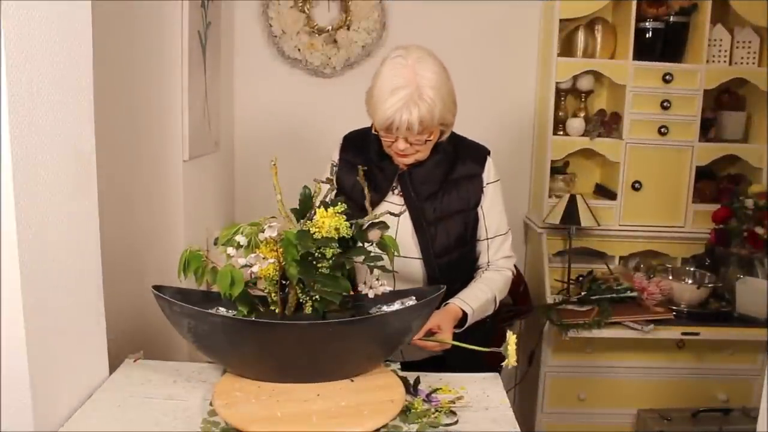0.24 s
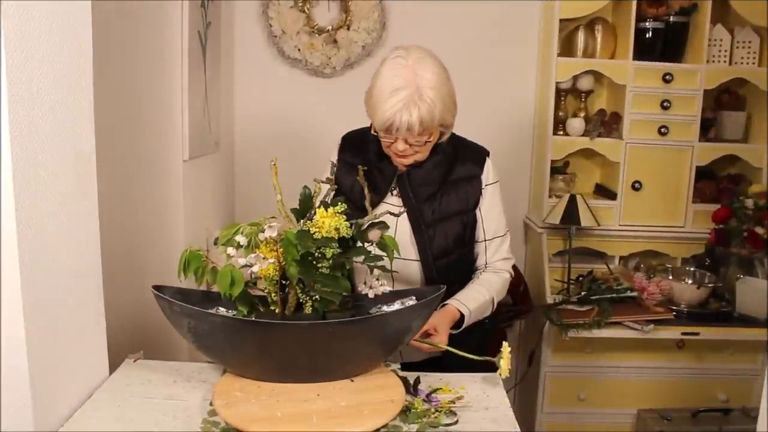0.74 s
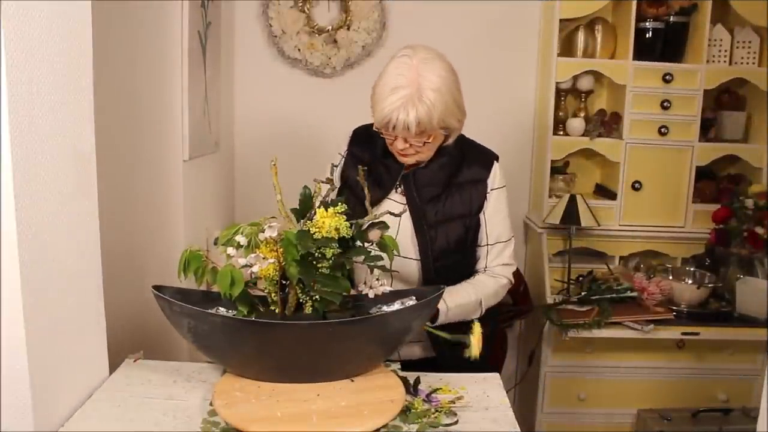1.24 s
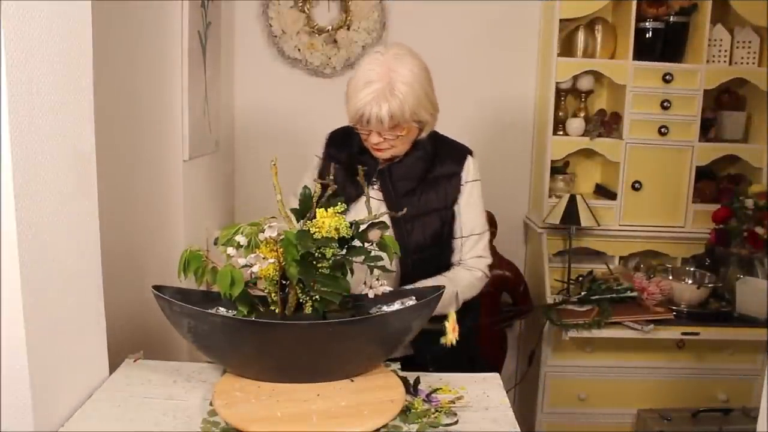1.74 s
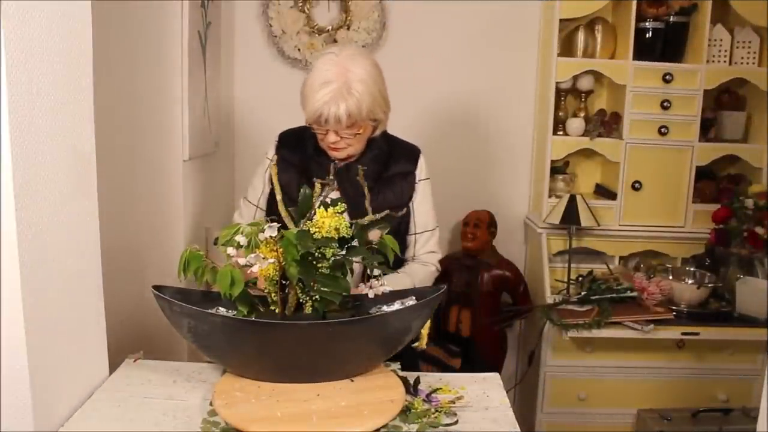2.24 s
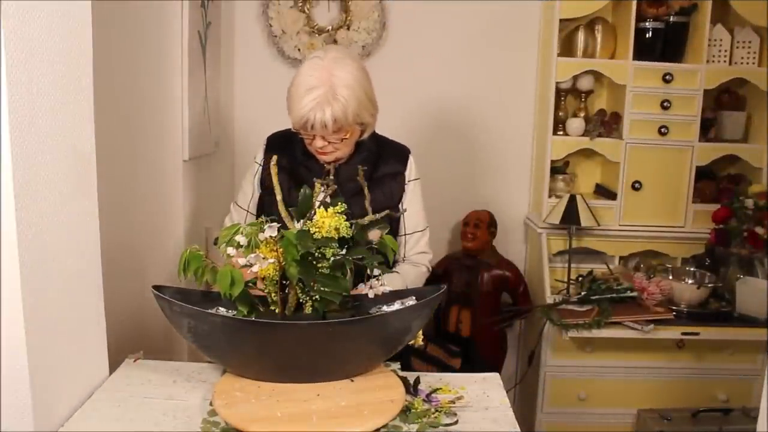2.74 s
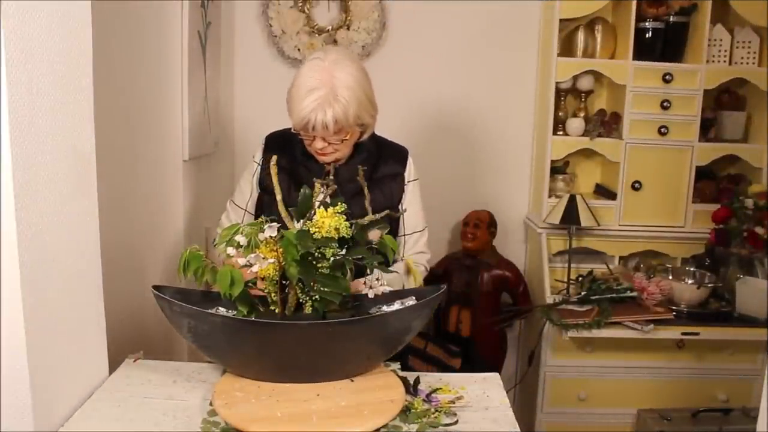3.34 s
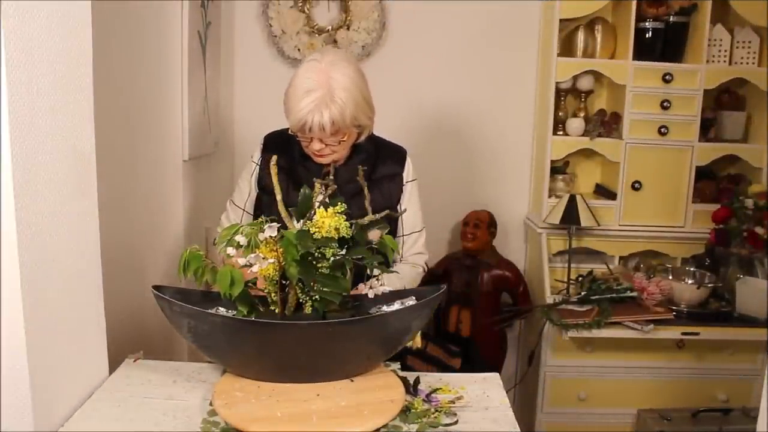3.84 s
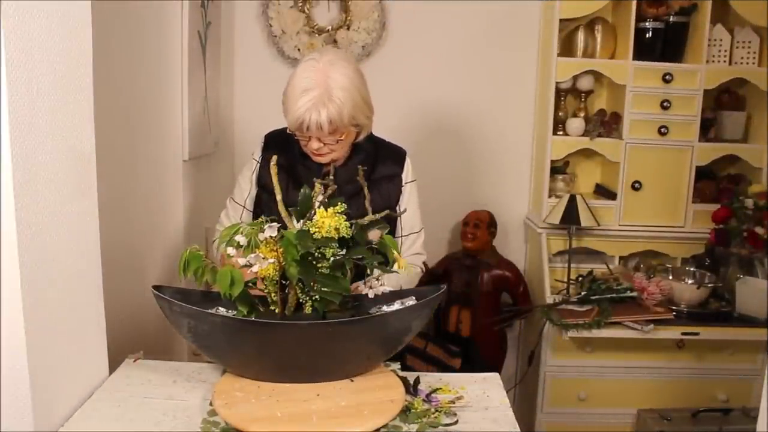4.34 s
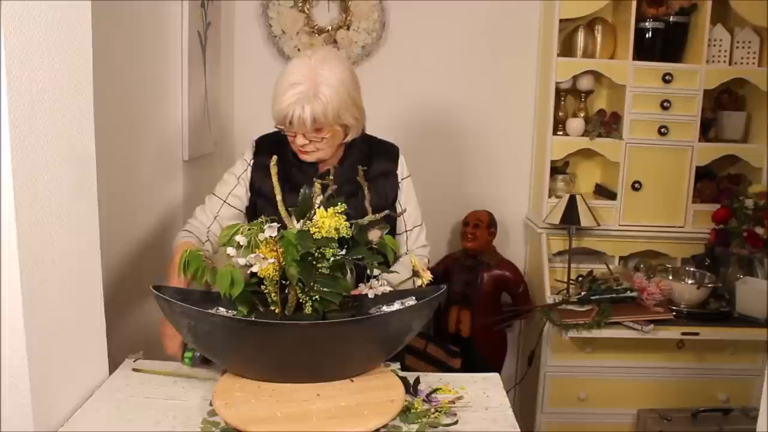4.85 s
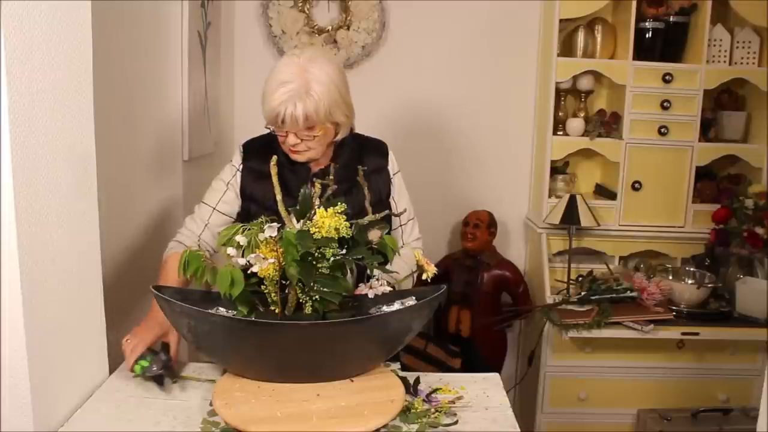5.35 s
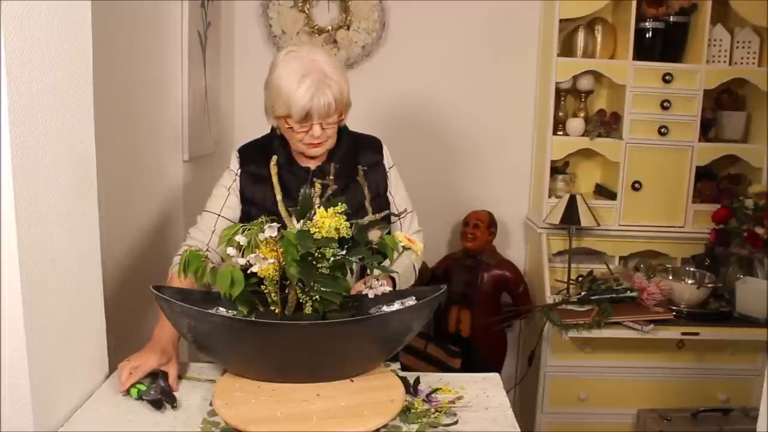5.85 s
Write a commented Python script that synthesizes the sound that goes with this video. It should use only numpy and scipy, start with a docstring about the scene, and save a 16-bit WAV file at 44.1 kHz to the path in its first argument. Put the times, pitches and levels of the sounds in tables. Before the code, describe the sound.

Quiet flower arranging indoors: leafy crackles, sleeve brushes, soft bowl bumps, two crisp snips, and a tool clattering onto a ringing tabletop.

```python
"""Flower arranging at a table

Flowers are arranged in a small, lively room: leaves tick and rustle, secateurs snip two stems (noisy
cracks and ringing steel), and stems bump a bowl. Then the secateurs clatter on the table top, whose
modes ring, slide across it in uneven slips and are set down with a loud knock. Sleeves brush as the
arms move; room reflections surround it all over steady room tone and microphone hiss."""
import sys
import numpy as np
from scipy import signal
from scipy.fft import rfft, irfft
from scipy.io import wavfile

SR = 44100
rng = np.random.default_rng(int(sys.argv[2]) if len(sys.argv) > 2 else 0)


def transcribe(signal):
    """Save signal, clipped to [-1, 1], as a 16-bit WAV file at the path in sys.argv[1]."""
    frames = np.atleast_2d(signal).T
    limited = np.clip(frames, -1, 1)
    pcm = np.round(limited * 32767).astype(np.int16)
    wavfile.write(sys.argv[1], SR, pcm)


N = 268128
TIME = np.arange(N) / SR
CUTOFF_HZ = 16050  # top of the audible band here


def from_db(db):
    """Decibels to gain."""
    return 10 ** (np.asarray(db) / 20)


def unit_energy(x):
    """Scale so that the squares sum to one."""
    return x / np.sqrt(np.sum(x ** 2) + 1e-20)


def at_hz(points, hz):
    """Read a table on a log-frequency axis."""
    known_hz, values = np.transpose(points)
    return np.interp(np.log(hz + 1), np.log(known_hz), values)


def add(track, start_s, sound):
    """Mix a sound into the track at start_s."""
    start = round(start_s * SR)
    track[start:start + len(sound)] += sound[:N - start]


def bins(size=4096):
    """Frequencies (Hz) on which short sounds are coloured."""
    return np.arange(size // 2 + 1) * SR / size


def pulse(colour_db):
    """The most compact causal pulse with this spectrum (minimum phase), at unit energy."""
    cepstrum = irfft(np.log(from_db(colour_db)))
    half = len(cepstrum) // 2
    # fold the cepstrum on to positive time, which makes the pulse causal
    cepstrum[1:half] *= 2
    cepstrum[half + 1:] = 0
    return unit_energy(irfft(np.exp(rfft(cepstrum))))


def coloured(x, spectrum):
    """Give a long signal a spectrum, at rms 1."""
    shaped = signal.fftconvolve(x, pulse(at_hz(spectrum, bins())))[:N]
    return unit_energy(shaped) * np.sqrt(N)


def ring(x, pitch_hz, t60_s):
    """One decaying mode: a unit click sets a wave of height 1 ringing."""
    radius = from_db(-60 / (t60_s * SR))
    angle = 2 * np.pi * pitch_hz / SR
    return signal.lfilter([.5, 0, -.5], [1, -2 * radius * np.cos(angle), radius * radius], x + 1e-18)


def grains(per_s, spread_db):
    """Random tiny slips of uneven size and either sign."""
    slips = rng.random(N) < per_s / SR
    signs = rng.choice([-1, 1], N)
    sizes = from_db(spread_db * np.clip(rng.standard_normal(N), -2, 2))
    return slips * signs * sizes


def swells(moves, shape):
    """Gain of friction: each move's speed is a half sine, and loudness is a power of the speed."""
    gain = np.zeros(N)
    for middle_s, length_s, level_db in moves:
        speed = np.cos(np.pi * np.clip((TIME - middle_s) / length_s, -.5, .5))
        gain += from_db(level_db) * np.abs(speed) ** shape
    return gain


def crack(colour_db, length_s, grit, size=2048, count=3):
    """A sharp contact with a short burst of breaking or rubbing fibres; grit sets the burst's share."""
    fade = np.exp(-np.arange(size) / SR / length_s)
    burst = grit * unit_energy(rng.standard_normal(size) * fade)
    burst[0] += 1
    # the burst has no pitch of its own: even out its spectrum and keep it short
    for _ in range(count):
        flat = irfft(np.exp(1j * np.angle(rfft(burst))))
        burst = flat * fade ** (1 / count)
    return unit_energy(signal.fftconvolve(burst, pulse(colour_db)))


def snips(grit):
    """Each snip is a few quick noisy cracks, mixing splitting stem and steel contact, with a ring of the blades."""
    # each cut is a few cracks in quick succession:
    # start_s, level_db, length_s, contact (0 = stem splitting .. 1 = steel on steel)
    cuts = [(2.1215, -10, 0.0021, 0.54), (2.125, -12, 0.00064, 0), (2.1289, -7, 0.0089, 0),
            (4.2170, -8, 0.004, 0.9), (4.2198, -6.5, 0.004, 0.81)]
    # spectra of splitting stem and of meeting steel: pitch_hz, level_db
    stem_split = [(100, -47), (250, -25), (450, -8.5), (800, -9), (1200, -11), (2200, 0), (3100, -1.5),
                  (4800, -3), (6500, -13), (7700, -15.5), (9000, -36), (12000, -34), (16000, -58)]
    steel_clack = [(120, -38), (250, -23), (600, -19.5), (1200, -10.5), (1800, -8.5), (2400, -7),
                   (3400, -5), (4500, -4.5), (6000, -4.5), (8200, -4.5), (9700, 3), (12000, -6.5),
                   (14000, 0), (16000, -15)]
    # ring of the blades: pitch_hz, level_db, t60_s
    blades = [(2325, -39, .42), (2450, -40, .33), (3090, -45, .28), (3612, -46, .19)]

    cracks, steel = np.zeros(N), np.zeros(N)
    for start_s, level_db, length_s, contact in cuts:
        stem_db = (1 - contact) * at_hz(stem_split, bins())
        steel_db = contact * at_hz(steel_clack, bins())
        add(cracks, start_s, from_db(level_db) * crack(stem_db + steel_db, length_s, grit))
        steel[round(start_s * SR)] = from_db(level_db) * contact
    ringing = sum(from_db(level_db) * ring(steel, pitch_hz, t60_s) for pitch_hz, level_db, t60_s in blades)
    return cracks + ringing


def contacts(count=3):
    """After each knock the tool rocks and touches twice more, each time weaker."""
    # secateurs knocking on the table:
    # start_s, level_db, cutoff_hz (contact), place (0 = far side .. 1 = near edge), gap_s (rebound)
    knocks = [(4.771, -27, 1500, 0.39, .0166), (4.874, -25, 800, .52, .0166),
              (4.9139, -0.5, 1760, 0.14, .0166), (5.0022, -8, 895, .2, .0128), (5.0150, -1, 900, .1, .0039),
              (5.048, -6, 700, .3, .0295), (5.162, -22, 970, 0.23, 0.024), (5.7298, -18, 756, 0.69, 0.032),
              (6.0510, 12.5, 775, 0.96, .0166)]
    rebound_loss_db = 7
    touched = []
    for start_s, level_db, cutoff_hz, place, gap_s in knocks:
        for k in range(count):
            touch_s = start_s + k * gap_s
            if touch_s < TIME[-1]:
                touched.append((touch_s, level_db - k * rebound_loss_db, cutoff_hz, place))
    return touched


def table(thud_db, size=512):
    """Knocks drive the table top; returns its dull thud and its ringing modes."""
    # modes of the table: pitch_hz, far_db (struck at the far side), near_db (at the near edge), t60_s
    table_modes = [(173.4, -58, -43.5, 0.12), (207, -50, -42.5, 0.23), (301, -35, -25.5, .28),
                   (435, -55, -26, 0.28), (446, -39.5, -37, 0.25), (585, -28.5, -32, 0.063),
                   (627, -57, -24, .16), (715.4, -33, -26, 0.26), (781, -26.5, -31, .26),
                   (808, -30, -27, 0.29), (957, -58, -44, 0.3), (1073, -28.5, -32, 0.2),
                   (1147, -34.5, -39, 0.21), (1375, -38, -35, 0.42), (1453, -66, -43, 0.28),
                   (1686, -45.5, -36.5, 0.37), (1720, -51, -55, .12), (2437, -41, -25, 0.11),
                   (2550, -48, -34, 0.22), (2780, -54, -35, 0.21), (3115, -29, -54, 0.21),
                   (3400, -30, -52, 0.22), (4584, -10, -55, 0.023)]
    # spectrum of the thud: pitch_hz, level_db
    thud_colour = [(40, -47), (110, -29), (170, -4), (240, -12), (310, 3.5), (450, 5), (900, 6),
                   (1400, -3.5), (3000, -0.5), (4500, -3.5), (6000, -8.5), (16000, -20)]

    far, near, t = np.zeros(N), np.zeros(N), np.arange(size) / SR
    for start_s, level_db, cutoff_hz, place in contacts():
        push = t * np.exp(-2 * np.pi * cutoff_hz * t)  # a softer contact pushes for longer
        push = from_db(level_db) * push / push.sum()
        nearness = np.clip(place, 0, 1)
        add(far, start_s, (1 - nearness) * push)
        add(near, start_s, nearness * push)

    modes = np.zeros(N)
    for k, (pitch_hz, far_db, near_db, t60_s) in enumerate(table_modes):
        drive = from_db(far_db) * far + from_db(near_db) * near
        modes += (-1) ** k * ring(drive, pitch_hz, t60_s)  # signs alternate from mode to mode
    thud = signal.fftconvolve(far + near, pulse(at_hz(thud_colour, bins())))[:N]
    return from_db(thud_db) * thud, modes


def touches(rows, colour, octaves, grit):
    """Light contacts, each with one broad resonance of the thing touched."""
    out = np.zeros(N)
    for start_s, level_db, length_s, ring_hz, ring_db in rows:
        distance = np.log2((bins() + 1) / ring_hz) / octaves
        hump_db = ring_db / (1 + distance ** 2)
        touch = crack(at_hz(colour, bins()) + hump_db, length_s, grit)
        add(out, start_s, from_db(level_db) * touch)
    return out


def ticks():
    """Leaves, stalks and the tool tick: brief contacts with a mostly high resonance."""
    # small ticks: start_s, level_db, length_s, ring_hz, ring_db
    tick_rows = [(.2108, -22, .0045, 8200, 5.5), (.3628, -24, 0.0033, 5850, 13),
                 (.3686, -21.5, 0.0014, 6500, 0), (.3890, -19, 0.003, 6800, 13),
                 (.6565, -26.5, .003, 3850, 9.5), (1.0568, -30.5, .004, 9000, -3),
                 (1.3105, -27.5, .005, 7300, 15), (1.3765, -25.5, .003, 5770, 16),
                 (1.6238, -30.5, .003, 4350, 27), (2.4564, -27, .0023, 8100, 0),
                 (2.6305, -30.5, .0033, 4560, 22), (3.916, -25, .012, 11600, 20),
                 (4.7708, -26, 0.0018, 1080, 22), (4.7785, -16, 0.0025, 6140, 6),
                 (4.9135, -17.5, 0.0012, 3870, 19.5), (4.929, -20, .009, 2630, 37),
                 (5.0145, -22, .003, 4600, 32), (5.9298, -24.5, .001, 9000, 4.5)]
    # their common spectrum: pitch_hz, level_db
    tick_colour = [(100, -18), (400, -3.5), (1000, -1.5), (2500, -3.5), (6000, -1), (11000, -6),
                   (16000, -9)]
    return touches(tick_rows, tick_colour, octaves=0.59, grit=2.7)


def bumps():
    """Hand and stems bump the bowl: soft contacts with a low resonance."""
    # soft bumps: start_s, level_db, length_s, ring_hz, ring_db
    bump_rows = [(.6575, -34, .006, 423, 10), (1.6245, -23.5, 0.0078, 215, 17),
                 (2.0295, -27, .003, 376, 4.5), (2.4155, -19, .018, 1070, 5.5),
                 (2.4565, -25.5, .003, 367, 25), (2.6295, -23.5, 0.013, 800, 10)]
    # their common spectrum: pitch_hz, level_db
    bump_colour = [(50, -46), (110, -17), (170, -11), (300, -0.5), (1100, -12.5), (1800, -15), (4000, -29),
                   (16000, -46)]
    return touches(bump_rows, bump_colour, octaves=0.56, grit=2.35)


def thump():
    """The heavy bowl is nudged: one push sets off low modes that die quickly."""
    # modes of the bowl: pitch_hz, level_db, t60_s
    bowl_modes = [(111, -47, 0.13), (196, -37.5, 0.072), (287, -38, 0.034), (525, -41, 0.068)]
    push = np.zeros(N)
    push[round(1.6235 * SR)] = 1  # moment of the nudge, in s
    return sum((-1) ** k * ring(push, pitch_hz, t60_s) * from_db(level_db)
               for k, (pitch_hz, level_db, t60_s) in enumerate(bowl_modes))


def slide():
    """Uneven slips of the tool on the table top, which the hand's weight damps."""
    # the tool pushed over the table: middle_s, length_s, level_db
    pushes = [(5.78, .16, -53), (5.91, .2, -52.5), (6.015, 0.045, -49.5)]
    # spectrum of the rubbing: pitch_hz, level_db
    rub_colour = [(60, -46), (160, -18), (300, 5.5), (360, 0), (430, 5), (530, -2.5), (640, 0), (800, -1),
                  (1300, -15), (3000, -20), (16000, -58)]
    return swells(pushes, shape=0.93) * coloured(grains(per_s=200, spread_db=0.5), rub_colour)


def leaves():
    """Brushed leaves crackle in separate grains that swell and fade with the hand."""
    # leaves being brushed: middle_s, length_s, level_db
    rustles = [(.345, 0.21, -52), (.51, 0.061, -61.5), (1.16, .24, -62.5), (1.53, 0.15, -58),
               (1.7, .12, -58.5), (2.28, 0.27, -57.5), (3.92, 0.17, -56.5), (4.645, .07, -55.5)]
    # spectrum of the crackle: pitch_hz, level_db
    leaf_colour = [(200, -29), (1000, 1.5), (3000, 5.5), (6000, 5.5), (12000, 1), (16000, -5)]
    return swells(rustles, shape=1.6) * coloured(grains(per_s=800, spread_db=1.5), leaf_colour)


def sleeves():
    """Sleeves brush smoothly: their slips are dense, and swell and fade with the arms."""
    # sleeves brushing as the arms move: middle_s, length_s, level_db
    arm_moves = [(.01, 0.22, -61), (1.21, 0.32, -57), (1.37, .14, -57.5), (1.54, 0.26, -57),
                 (1.72, 0.19, -66), (2.15, 1, -59.5), (2.98, 0.13, -61), (3.6, 0.54, -65),
                 (4.1, 0.86, -68.5), (4.75, 0.53, -58.5), (5.63, 0.36, -58.5), (5.87, 0.34, -61)]
    # spectrum of the cloth: pitch_hz, level_db
    sleeve_colour = [(100, -19), (400, -4.5), (1200, 0.5), (2600, -1), (5000, -5.5), (9000, -21.5),
                     (16000, -14.5)]
    return swells(arm_moves, shape=1.14) * coloured(grains(per_s=6000, spread_db=1.5), sleeve_colour)


def room_tail(build_s, count=12):
    """Dense reflections that build up quickly and fade at a rate set by frequency, fastest at the top."""
    # decay time of the room: pitch_hz, t60_s
    room_decay = [(150, .36), (500, .38), (1500, .42), (3500, .36), (7000, .31), (15000, .24)]
    t = np.arange(SR // 2) / SR
    noise, hz = rfft(rng.standard_normal(len(t))), bins(size=len(t))
    centres = np.geomspace(100, CUTOFF_HZ, count)
    tail = np.zeros(len(t))
    for centre, pick in zip(centres, np.eye(count)):
        # overlapping bands: each fades out where its neighbours fade in
        band = irfft(noise * at_hz(np.c_[centres, pick], hz), len(t))
        tail += band * from_db(-60 * t / at_hz(room_decay, centre))
    return unit_energy(tail * (1 - np.exp(-t / build_s)))


def background():
    """Steady room tone and microphone hiss: noise with a fixed spectrum."""
    # spectrum of the background: pitch_hz, level_db
    hiss_colour = [(20, -25), (32, -7.5), (48, -0.5), (68, -9), (100, -15), (150, -12.5), (220, -7),
                   (400, -5.5), (850, -4.5), (1600, -6.5), (3500, -9), (6000, -12.5), (10000, -17.5),
                   (16000, -17)]
    return from_db(-57) * coloured(rng.standard_normal(N), hiss_colour)


def scene():
    """All sources share one room, each with its own balance of direct sound and reflections."""
    tail = room_tail(build_s=0.00028)

    def in_room(x, direct_db, room_db):
        """Direct sound plus reflections."""
        return from_db(direct_db) * x + from_db(room_db) * signal.fftconvolve(x, tail)[:N]

    thud, modes = table(thud_db=0)
    sources = in_room(snips(grit=4.8), direct_db=2.5, room_db=4.5)
    sources += in_room(thud, direct_db=-4.5, room_db=7.0)
    sources += in_room(modes + thump(), direct_db=3.0, room_db=-5.5)
    sources += in_room(ticks(), direct_db=3.5, room_db=6.5)
    sources += in_room(bumps(), direct_db=2.0, room_db=8.0)
    sources += in_room(slide() + leaves() + sleeves(), direct_db=0.0, room_db=-2.0)
    # the microphone picks up little bass from these sounds: high-pass at 203 Hz
    bass_cut = signal.butter(2, 203, "high", fs=SR, output="sos")
    return (signal.sosfilt(bass_cut, sources) + background())[None]


def record(dry):
    """The loudest peaks are rounded, then a steep low-pass cuts the top."""
    top_cut = signal.ellip(12, .1, 80, CUTOFF_HZ, fs=SR, output="sos")  # 0.1 dB ripple, 80 dB stop
    return signal.sosfilt(top_cut, np.tanh(dry))


dry = scene()
out = record(dry)
transcribe(out)
```